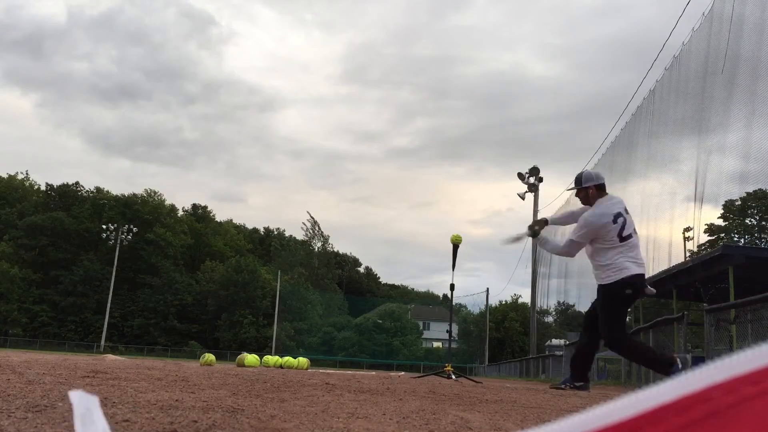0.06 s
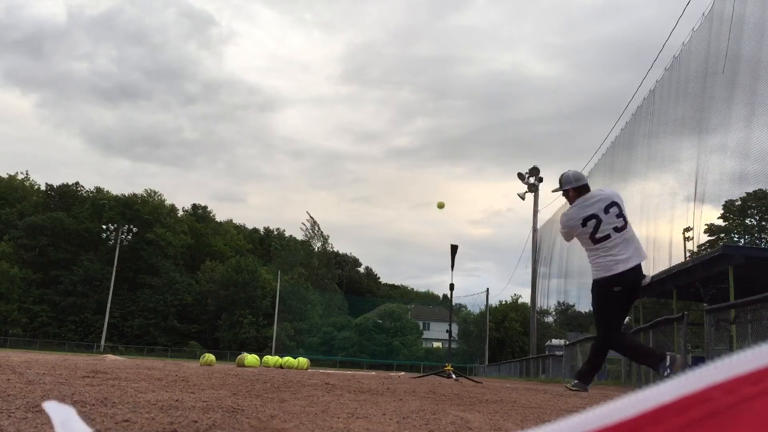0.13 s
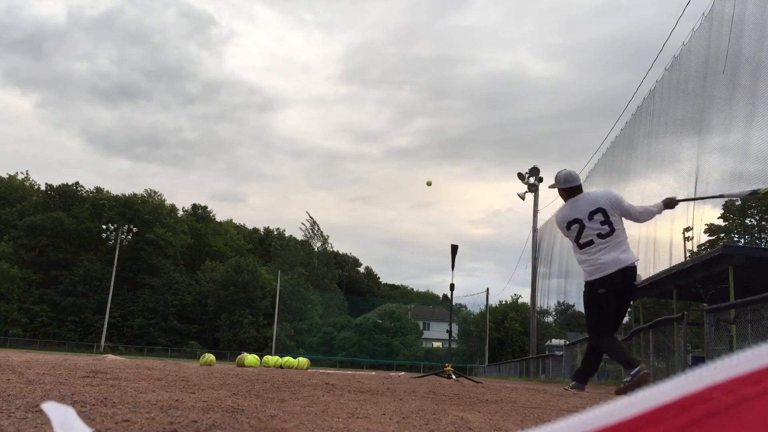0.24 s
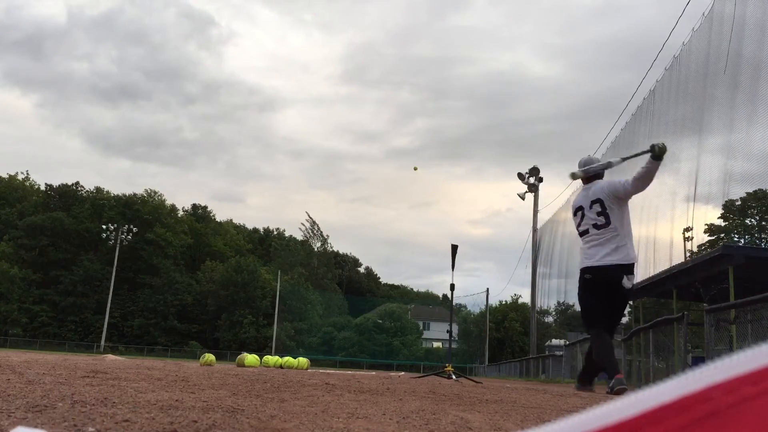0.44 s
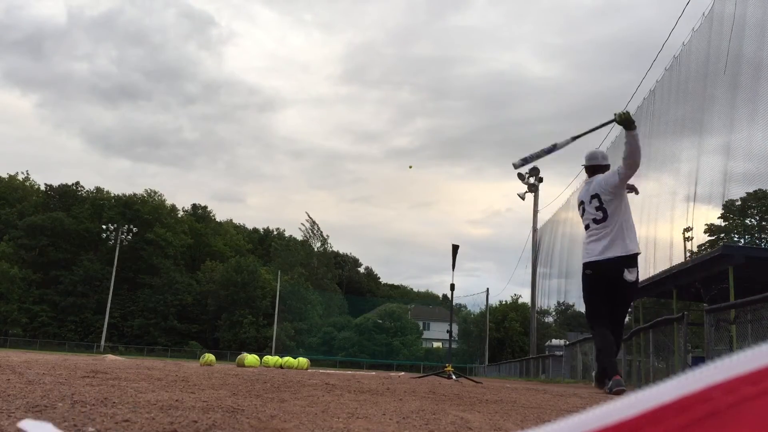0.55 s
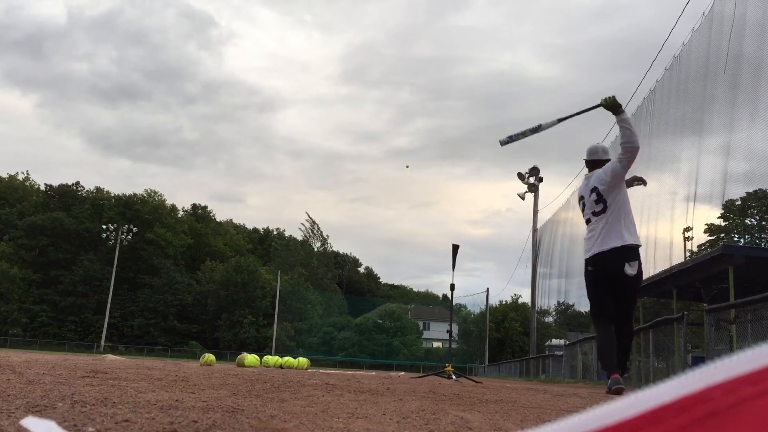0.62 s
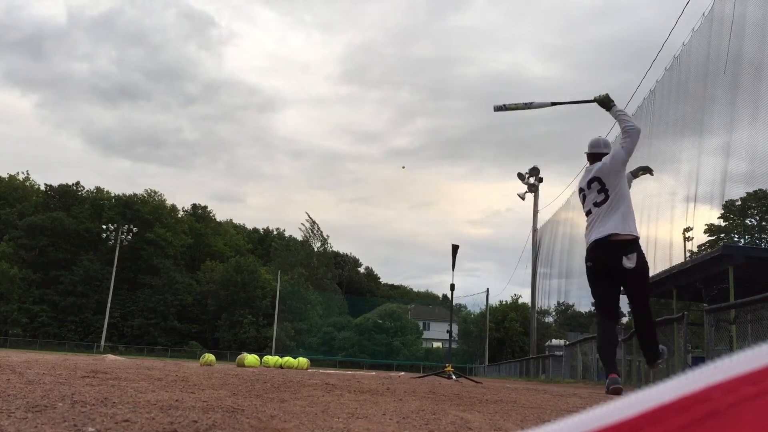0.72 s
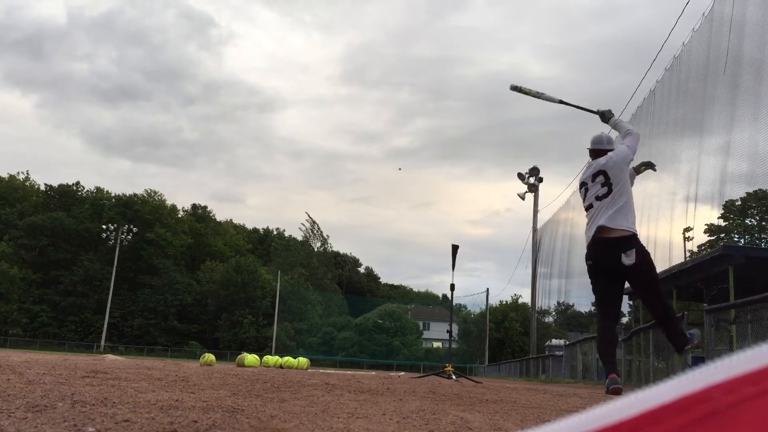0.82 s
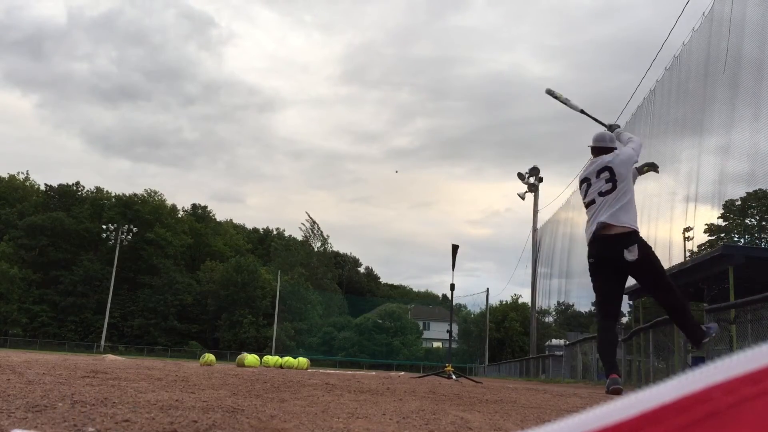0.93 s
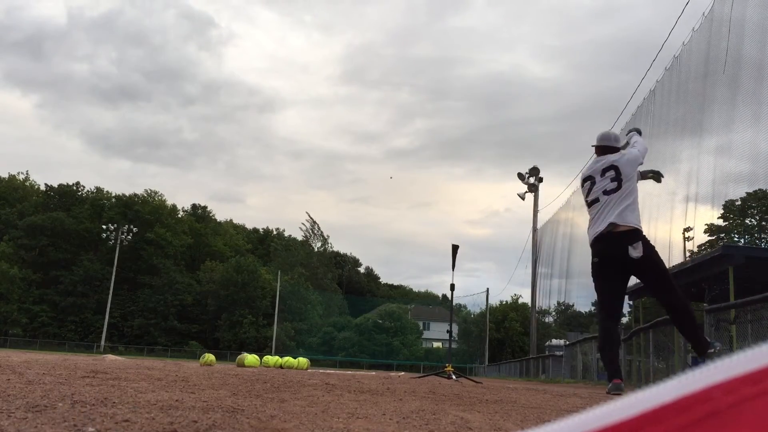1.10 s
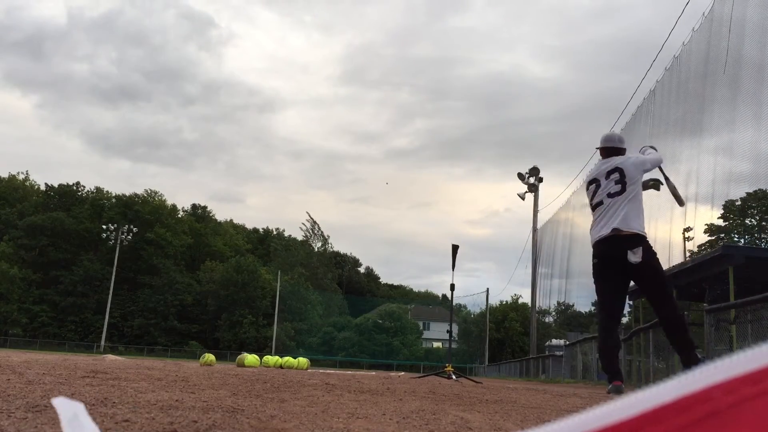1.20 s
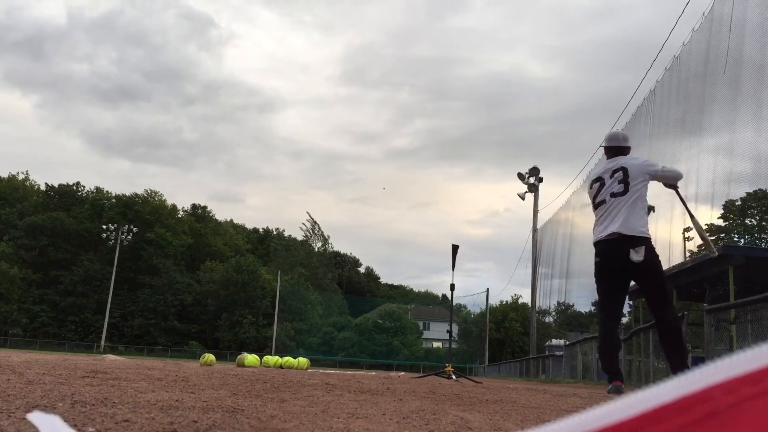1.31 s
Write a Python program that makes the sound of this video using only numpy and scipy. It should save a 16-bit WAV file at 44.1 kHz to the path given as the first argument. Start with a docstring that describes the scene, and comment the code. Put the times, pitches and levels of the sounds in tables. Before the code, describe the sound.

A bat strikes a softball with one loud, sharp crack at about 0.2 seconds, a few metres away on an open field. Just before it, a shoe scuffs faintly on dirt and the bat swishes. The barrel rings briefly, a faint tick follows at 0.3 seconds, and weak distant echoes fade by about 1 second. Light wind thumps on the microphone throughout, over a quiet outdoor background.

```python
"""A bat drives a softball off a tee on an open field, a few metres from the microphone.
Contact gives a bright crack and a pulse of air that briefly overload the input; ball and barrel ring.
Before it a shoe scuffs and the bat swishes; after it come a faint tick and a rustle.
Ground and fence scatter the hit; the dugout, distant buildings and trees return it.
Light wind buffets the microphone over a faint outdoor background."""
import sys
import numpy as np
from scipy import signal
from scipy.fft import irfft
from scipy.io import wavfile
from scipy.ndimage import uniform_filter1d

SR = 44100
rng = np.random.default_rng(int(sys.argv[2]) if len(sys.argv) > 2 else 0)


def store_wav(level_fs):
    """Save 16-bit WAV to argv[1]."""
    pcm = np.round(np.clip(np.atleast_2d(level_fs), -1, 1) * 32767)
    wavfile.write(sys.argv[1], SR, pcm.T.astype(np.int16))


N = 59535
T = np.arange(N) / SR
HZ = np.fft.rfftfreq(N, 1 / SR)
HIT_S = .215


def contact():
    """Bat meets ball: a noise crack, then an air pulse from the squashed ball and its ground bounce."""
    # crack spectrum: f/Hz, level/dB
    spectrum = [(100, -18), (300, -5.5), (1500, -1.5), (2200, -8), (2750, -0.5), (3200, -9.5), (5000, -6),
                (5800, -7), (7000, 0), (8500, -9), (10000, -12.5), (12100, -5.5), (13800, -15.5),
                (15500, -11.5), (17000, -19.5)]
    crack = amp(-4.5) * noise(read(spectrum, HZ)) * decay(HIT_S, rise_s=.0002, t60_s=.0095)
    push_s, bounce_delay_s, push_hz = HIT_S + .0018, .00065, 1027
    push = pulse(push_s, push_hz) + amp(-1) * pulse(push_s + bounce_delay_s, push_hz)
    return crack + amp(2) * push


def barrel_and_ball():
    """The struck barrel rings in its modes; the ball rings briefly as it leaves."""
    # barrel modes: f/Hz, level/dB, t60/s
    barrel_modes = [(1231, -5.5, .068), (1386, -27, 0.31), (2184, -17.5, .085), (2724, -14.5, 0.033),
                    (3448, -24, .08), (4680, -27, .07), (6010, -22.5, .035), (6130, -17.5, .04),
                    (7550, -16.5, .015), (9070, -13, .018), (11800, -19, 0.011), (12470, -18, .01)]
    # ball modes: f/Hz, level/dB, t60/s
    ball_modes = [(300, -22.5, .014), (593.6, -9, 0.022), (820, -16, .014), (939, -4, 0.022),
                  (1470, -8, .014), (2664, -8.5, .009)]
    return ring(barrel_modes, HIT_S, rise_s=.0005) + ring(ball_modes, HIT_S + .001496, rise_s=.0004)


def scatter():
    """Ground and fence scatter the hit into a diffuse tail; a few low notes linger."""
    # tail spectrum: f/Hz, level/dB
    spectrum = [(100, -18), (400, -13), (800, 1.5), (1500, 3), (2600, -3), (3200, -16), (4600, -17.5),
                (6500, -16.5), (9500, -22.5), (12500, -23), (16000, -27)]
    # tail decay: f/Hz, t60/s
    decay_times = [(200, .2), (700, .16), (1500, .12), (3000, .11), (7000, .12), (15000, 0.062)]
    # lingering notes: f/Hz, level/dB, t60/s
    notes = [(655, -30.5, 0.1), (787, -30.5, 0.14), (933.5, -34.5, 0.25), (1130, -26, 0.037),
             (1460, -29, .1), (1582, -30.5, 0.074), (1789, -29.5, .1)]
    hz, t, bins = signal.stft(noise(read(spectrum, HZ)), SR, nperseg=256)
    fade = amp(-60 * np.maximum(t - HIT_S, 0) / read(decay_times, hz)[:, None])
    tail = signal.istft(bins * fade, SR, nperseg=256)[1][:N]
    onset = np.clip((T - HIT_S) / .003, 0, 1)
    return amp(-14.5) * tail * onset + ring(notes, HIT_S, rise_s=.0068)


def near_slaps():
    """Bright reflections off the fence and dugout."""
    # reflections: delay/s, level/dB, t60/s
    slaps = [(0.018, -26.5, 0.051), (0.058, -47.5, 0.11)]
    # slap spectrum: f/Hz, level/dB
    spectrum = [(300, -7.5), (1500, 0.5), (3000, 1.5), (4800, 1.5), (7500, -4), (10000, -12), (12500, -5.5),
                (16000, -11.5)]
    envelope = sum(amp(db) * decay(HIT_S + delay_s, .003, t60_s) for delay_s, db, t60_s in slaps)
    return envelope * noise(read(spectrum, HZ))


def far_echoes():
    """Buildings and trees return the crack, dulled by the air, over a weak wash from the field."""
    # echoes: delay/s, level/dB, rise/s, t60/s, air loss/(dB/kHz)
    echoes = [(0.159, -39.5, .016, 0.31, 2.5), (.535, -58, .03, 0.98, 8), (.655, -57.5, 0.0089, 0.18, 7)]
    # echo spectrum before air loss: f/Hz, level/dB
    echo_spectrum = [(200, -6.5), (600, -5.5), (1050, -4), (1650, 4.5), (2100, -7), (2700, -8), (3300, -18),
                     (4100, -18), (5000, -24), (6500, -13.5), (10000, -22.5), (16000, -40)]
    # wash spectrum: f/Hz, level/dB
    wash_spectrum = [(200, -10), (700, -5.5), (1200, 1.5), (1800, -11), (2400, -12), (3200, -17),
                     (4000, -12), (5200, -20), (7000, -17), (9000, -19), (12000, -28.5), (16000, -38)]
    out = amp(-45) * decay(HIT_S, rise_s=.055, t60_s=.38) * noise(read(wash_spectrum, HZ))
    for delay_s, db, rise_s, t60_s, loss_db_per_khz in echoes:
        dulled = noise(read(echo_spectrum, HZ) - loss_db_per_khz * HZ / 1000)
        out += amp(db) * decay(HIT_S + delay_s, rise_s, t60_s) * dulled
    return out


def barrel_echoes():
    """The barrel's lasting notes come back smeared: part tone, part narrow noise."""
    # echoes: delay/s, level/dB, t60/s, tilt/(dB/oct)
    echoes = [(0.076, -32.5, .17, -0.5), (0.226, -46.5, .25, -16), (0.547, -56, .25, 14),
              (0.653, -45.5, 0.19, 0.5)]
    # returning notes: f/Hz, level/dB
    notes = [(1390, 1), (2390, -17.5)]
    smear, rise_s = .55, .0093
    out = np.zeros(N)
    for delay_s, db, t60_s, tilt_db_per_oct in echoes:
        envelope = decay(HIT_S + delay_s, rise_s, t60_s)
        for hz, note_db in notes:
            tone = np.sqrt(2) * np.sin(2 * np.pi * hz * T)
            note = (1 - smear) * tone + smear * band(hz, half_width_oct=.032)
            tilt_db = tilt_db_per_oct * np.log2(hz / notes[0][0])
            out += amp(db + note_db + tilt_db) * envelope * note
    return out


def swing():
    """The bat hisses as it gathers speed, then swishes as it nears the ball."""
    # swish spectrum: f/Hz, level/dB
    spectrum = [(150, -5.5), (700, -5.5), (1450, 5), (2200, -11), (3500, -26.5), (8000, -26.5),
                (16000, -33.5)]
    peak_s, fall_s = .205, .01
    swish = amp(-37) * swell(peak_s, .017, fall_s) * noise(read(spectrum, HZ))
    hiss = amp(-66) * swell(peak_s, .04, fall_s) * band(5500, half_width_oct=.45)
    return swish + hiss


def scuff():
    """A shoe pivots on the dirt."""
    # scuff spectrum: f/Hz, level/dB
    spectrum = [(200, -11.5), (900, -2.5), (1400, 8.5), (2300, -6), (3200, -24.5), (7000, -30.5),
                (16000, -42.5)]
    return amp(-47.5) * swell(peak_s=.1, rise_s=.0092, fall_s=.057) * noise(read(spectrum, HZ))


def follow_through():
    """A dry tick, perhaps the tee springing back, then a faint high rustle."""
    # tick spectrum: f/Hz, level/dB
    spectrum = [(1000, -20), (4500, -6), (6300, 8), (7500, -0.5), (8800, -2), (10500, -12), (12500, -12),
                (16000, -15.5)]
    tick = amp(-46) * decay(start_s=.3165, rise_s=.00071, t60_s=.01) * noise(read(spectrum, HZ))
    rustle = amp(-77.5) * swell(peak_s=.78, rise_s=.074, fall_s=.074) * band(7800, half_width_oct=.25)
    return tick + rustle


def wind():
    """Each buffet on the microphone is a low thump of sagging pitch, plus turbulence."""
    # buffets: t/s, level/dB, rise/s, fall/s, f/Hz
    gusts = [(.003, -32.5, .006, .008, 81), (0.041, -35, 0.005, 0.016, 75.9),
             (0.161, -38.5, 0.052, 0.027, 74.3), (.238, -35.5, 0.013, 0.022, 64.5),
             (0.374, -32, 0.0089, 0.01, 105), (.395, -31, 0.014, .012, 69.75),
             (0.511, -32, .005, 0.011, 112), (.566, -35, 0.014, .01, 90), (0.643, -40, .012, .01, 65),
             (0.707, -32.5, 0.013, 0.04, 79.34), (0.819, -35.5, 0.027, 0.022, 62),
             (.905, -27, 0.0089, 0.011, 101), (0.954, -35.5, 0.0087, .012, 75.85),
             (.988, -32.5, 0.0035, 0.022, 110.1), (1.078, -30.5, 0.0018, .02, 120),
             (1.125, -27.5, 0.0048, 0.006, 105), (1.149, -27, 0.0063, 0.0049, 115),
             (1.228, -44, 0.021, 0.026, 79)]
    # turbulence spectrum: f/buffet pitch, level/dB
    spectrum = [(.3, -25), (.7, -2), (1, -2.5), (1.7, -3.5), (2.6, -9), (5, -22.5), (12, -49), (60, -89.5)]
    sag_oct_per_s = 14
    out = np.zeros(N)
    for peak_s, db, rise_s, fall_s, hz in gusts:
        pitch_hz = hz * 2 ** np.clip(-sag_oct_per_s * (T - peak_s), -.5, .5)
        thump = np.sin(2 * np.pi * (np.cumsum(pitch_hz) / SR + rng.random()))
        turbulence = amp(-7.5) * noise(read(spectrum, HZ / hz))
        out += amp(db) * swell(peak_s, rise_s, fall_s) * (thump + turbulence)
    return out


def background():
    """Distant outdoor noise whose spectrum drifts in small patches."""
    # open-air spectrum: f/Hz, level/dB
    spectrum = [(20, -29.5), (35, -13.5), (55, 0.5), (110, -2), (200, -7.5), (400, -14.5), (650, -13),
                (1000, -19.5), (1500, -27), (2200, -39.5), (4000, -45), (7000, -49.5), (11000, -55),
                (16000, -56)]
    patch_db, patch_hz, patch_s = 2.5, 90, .07
    hz, t, bins = signal.stft(noise(read(spectrum, HZ)), SR, nperseg=1024, noverlap=768)
    patches = uniform_filter1d(rng.standard_normal(bins.shape), round(patch_hz / hz[1]), axis=0)
    patches = uniform_filter1d(patches, round(patch_s / t[1]), axis=1)
    drift = amp(patch_db * patches / patches.std())
    air = signal.istft(bins * drift, SR, nperseg=1024, noverlap=768)[1][:N]
    return amp(-44) * air / air.std()


def amp(db):
    """Decibels to gain."""
    return 10 ** (np.asarray(db) / 20)


def read(points, hz):
    """Interpolate a table over log frequency."""
    f, value = np.transpose(points)
    return np.interp(np.log(hz + 1e-6), np.log(f), value)


def noise(spectrum_db):
    """Unit-RMS noise with the given spectral density shape."""
    x = irfft(np.exp(2j * np.pi * rng.random(len(HZ))) * amp(spectrum_db), N)
    return x / x.std()


def band(hz, half_width_oct):
    """Noise in a bell-shaped band, 3 dB down at the half width."""
    return noise(-3 * (np.log2((HZ + 1) / hz) / half_width_oct) ** 2)


def decay(start_s, rise_s, t60_s):
    """Linear rise, exponential fall."""
    age_s = T - start_s
    return np.clip(age_s / rise_s, 0, 1) * amp(-60 * np.maximum(age_s - rise_s, 0) / t60_s)


def swell(peak_s, rise_s, fall_s):
    """Gaussian hump with separate rise and fall widths."""
    return np.exp(-.5 * ((T - peak_s) / np.where(T < peak_s, rise_s, fall_s)) ** 2)


def ring(modes, start_s, rise_s):
    """Struck modes as a sum of decaying sines."""
    return sum(amp(db) * decay(start_s, rise_s, t60_s) * np.sin(2 * np.pi * hz * (T - start_s))
               for hz, db, t60_s in modes)


def pulse(peak_s, hz):
    """Pressure pulse with a shallow trough on either side."""
    u = (np.pi * hz * (T - peak_s)) ** 2
    return (1 - 2 * u) * np.exp(-u)


def scene():
    """Batter, hit, reflections and open air, in mono."""
    batter = scuff() + swing() + follow_through()
    hit = contact() + barrel_and_ball()
    reflections = scatter() + near_slaps() + far_echoes() + barrel_echoes()
    return (batter + hit + reflections + wind() + background())[None]


def record(dry):
    """The input soft-clips on the crack, then is low-passed."""
    ceiling, knee, cutoff_hz = .96, 5, 16000
    clipped = dry / (1 + abs(dry / ceiling) ** knee) ** (1 / knee)
    low_pass = signal.firwin(161, cutoff_hz, window=("kaiser", 8), fs=SR)
    return signal.oaconvolve(clipped, low_pass[None], "same")


dry = scene()
out = record(dry)
store_wav(out)
```